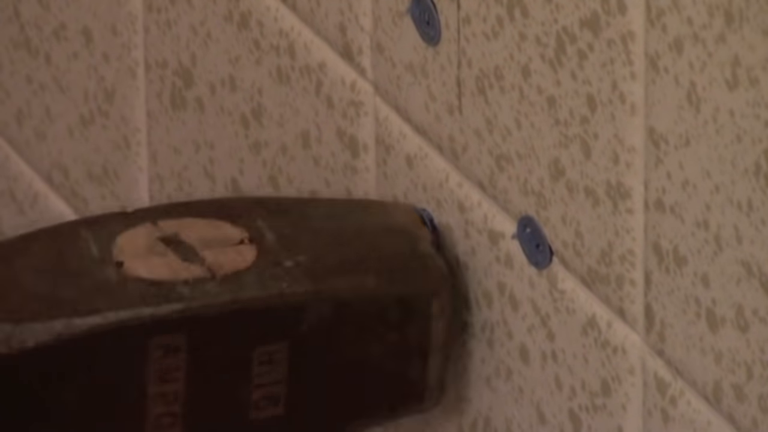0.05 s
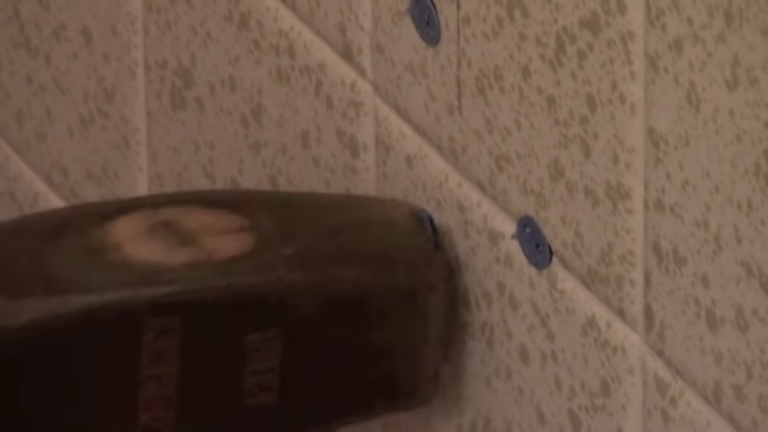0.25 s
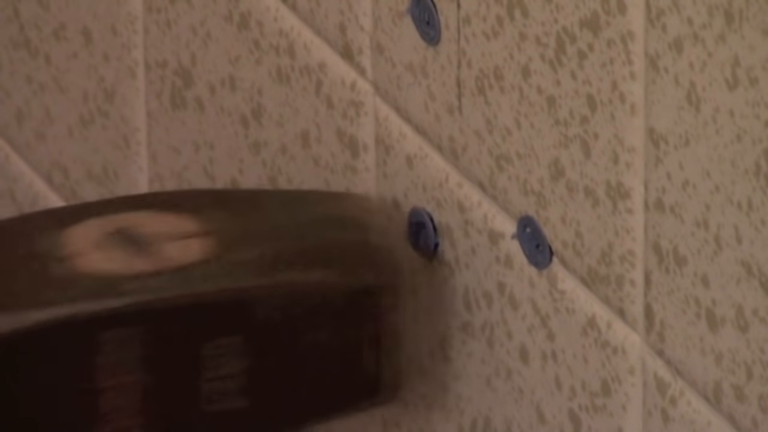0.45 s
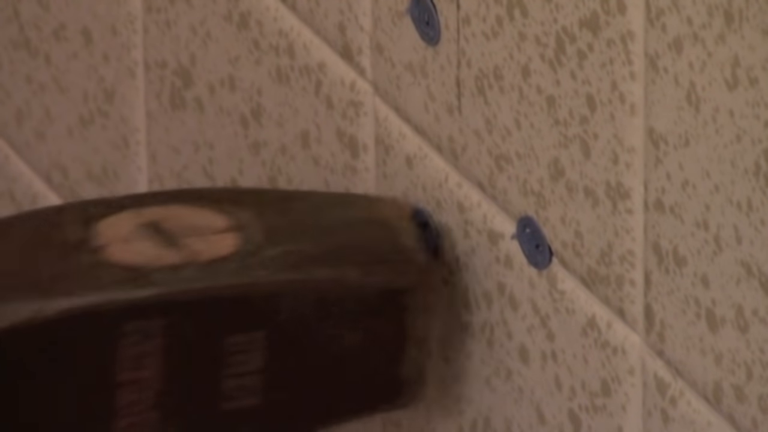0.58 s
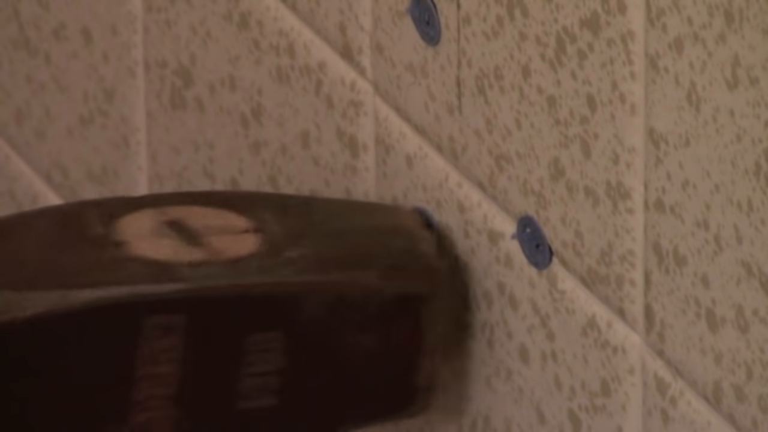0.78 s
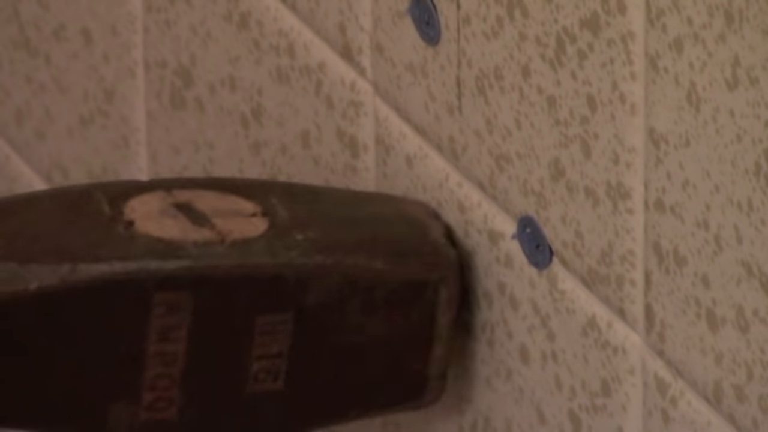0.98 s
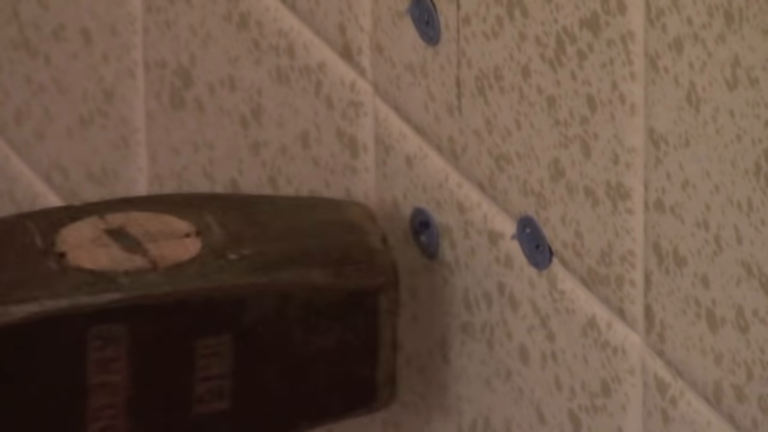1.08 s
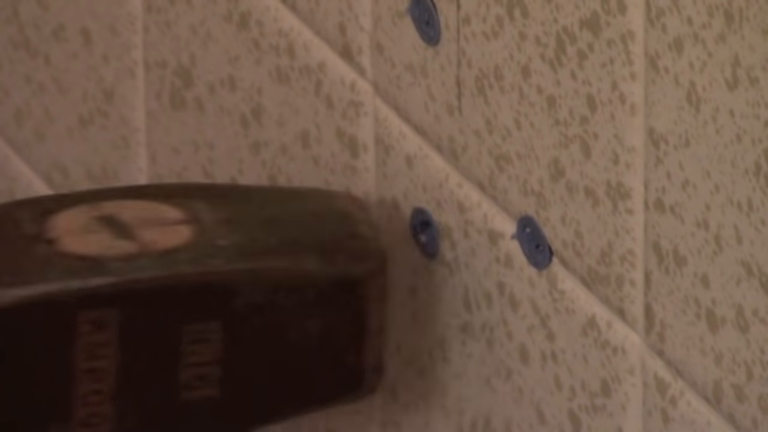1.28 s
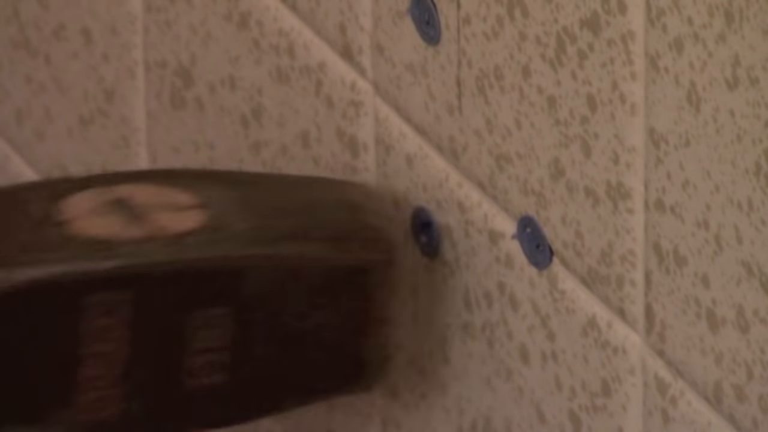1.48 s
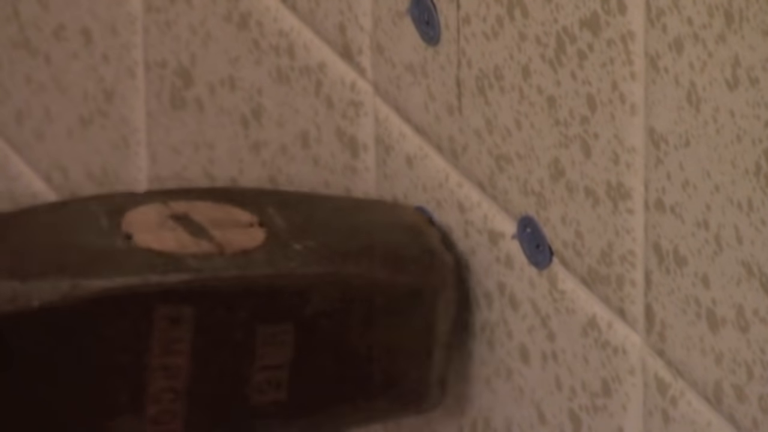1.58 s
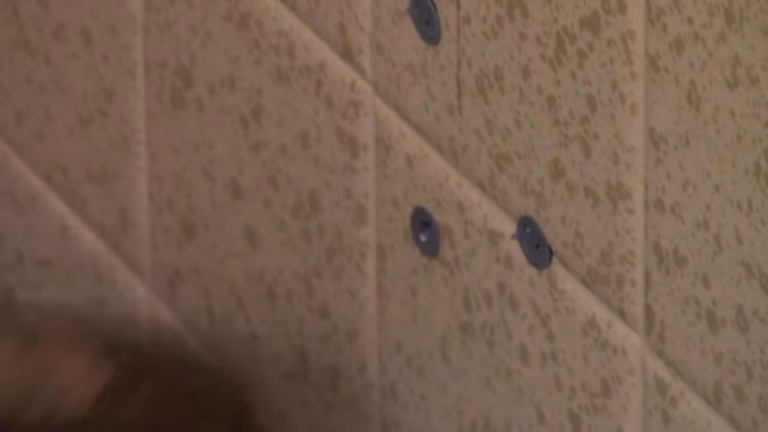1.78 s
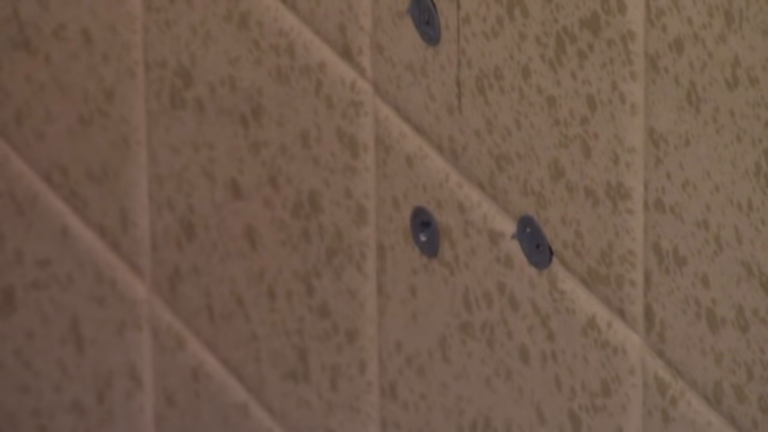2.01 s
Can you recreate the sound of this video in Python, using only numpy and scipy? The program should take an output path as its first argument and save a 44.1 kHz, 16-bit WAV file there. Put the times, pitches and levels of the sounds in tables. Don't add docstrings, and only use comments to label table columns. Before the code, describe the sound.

Steel hammer taps a plastic anchor into a tiled wall, eight steady knocks growing firmer and boomier

```python
import sys
import numpy as np
from scipy import signal
from scipy.fft import rfft, irfft
from scipy.io import wavfile

SR = 44100
rng = np.random.default_rng(int(sys.argv[2]) if len(sys.argv) > 2 else 0)


def voltage_ratio(level):
    return 10 ** (np.asarray(level, float) / 20)


def waveform_to_disk(signal):
    frames = np.transpose(np.atleast_2d(signal))
    scaled = np.clip(frames, -1, 1) * 32767
    samples = np.round(scaled).astype(np.int16)
    wavfile.write(sys.argv[1], SR, samples)


N = 90404
LEAD = SR // 10
RING = SR

# (time [s], tile level [dB], contact time [ms], panel level [dB], tick level [dB])
BLOWS = [
    (-.072, -9.5, 0.26, -24.5, -63),
    (0.1504, -12.5, 0.1, -18.5, -31),
    (0.3722, -12, 0.19, -12, -34),
    (0.5938, -12, 0.17, -10.5, -38),
    (0.8052, -6.5, 0.16, -9.5, -28.5),
    (1.0244, -4.5, 0.21, -9.5, -40.5),
    (1.2509, -4.5, 0.2, -8, -35),
    (1.4730, -2, 0.18, -7.5, -48),
    (1.6948, -1.5, 0.17, -7.5, -41.5),
]
# (bright wash [dB], knock [dB], cavity [dB], upper panel [dB], clack [dB])
LANDINGS = [(-6.5, -3, 4.5, -4, 0), (-1, 2, -17, -1, 3.5), (-6.5, -5.5, -0.5, -10.5, 4.5),
            (-1.5, 1.5, -0.5, -12, 1), (3, 4, -0.5, -10.5, -6), (0.5, -17, 2, 0, -3), (2, 1.5, 2.5, -1, -4),
            (2.5, -3, 1, 1, 0), (4, -2.5, 0, -1.5, -3)]


def band(x, hz, width):
    return signal.lfilter(*signal.iirpeak(min(hz, .45 * SR), hz / width, fs=SR), x)


def twice(x, hz, width):
    return band(band(x, hz, width), hz, width)


def fade(t60):
    return np.exp(-np.log(1000) * np.arange(RING) / SR / t60)


def rise(seconds):
    return 1 - np.exp(-np.arange(RING) / SR / seconds)


def modes(table, degrees):
    t = np.arange(RING) / SR
    return sum(np.sign(side) * voltage_ratio(db) * np.cos(2 * np.pi * hz * t + np.radians(degrees)) * fade(t60)
               for hz, db, t60, side in table)


def lay(sounds):
    out = np.zeros(LEAD + N + 2 * RING)
    for row, sound in zip(BLOWS, sounds):
        start = LEAD + int(row[0] * SR)
        out[start:start + len(sound)] += sound
    return out[LEAD:LEAD + N]


def push(contact_ms):
    t = np.arange(SR // 100) / (contact_ms * SR / 1000)
    force = (.6 * t) ** 2 * t * np.exp(-1.6 * t)
    return force / force.sum()


def flexing():
    # (frequency [Hz], level [dB], t60 [s], side of nodal line)
    deep_modes = [(45.3, -26, 0.91, 1), (48.6, -45.5, 0.13, 1), (66, -23.5, 0.43, -1), (83, -31, 0.38, 1)]
    # (frequency [Hz], level [dB], t60 [s], side of nodal line)
    stud_modes = [(128.32, -15, 0.44, 1)]
    return modes(deep_modes, 120) + modes(stud_modes, 205)


def panel():
    # (frequency [Hz], level [dB], t60 [s], side of nodal line)
    panel_modes = [(152.7, -9.5, 0.42, 1), (218.9, -5, 0.37, 1)]
    return modes(panel_modes, 140)


def upper_panel():
    # (frequency [Hz], level [dB], t60 [s], side of nodal line)
    upper_modes = [(331.7, -8, 0.2, 1), (347.6, -12, 0.62, -1), (370.8, -16.5, 0.56, 1),
                   (417.4, -14.5, 0.36, 1), (450.4, -17, 0.57, 1), (468, -12, 0.43, 1)]
    return modes(upper_modes, 140)


def cavity():
    # (frequency [Hz], level [dB], t60 [s], side of nodal line)
    cavity_modes = [(252.7, 3, 0.24, 1), (248.1, -13, 0.18, -1)]
    return modes(cavity_modes, 105) * rise(0.017)


def tile():
    # (frequency [Hz], level [dB], t60 [s], side of nodal line)
    tile_modes = [(507.9, -10, .25, 1), (571, -11.5, 0.18, 1), (640.7, -14.5, 0.13, -1), (676, -24, 0.7, 1),
                  (675, -43, 0.49, 1), (850.7, -22, 0.47, -1), (886.5, -10, 0.12, 1),
                  (1027, -30.5, 0.45, -1), (1008.6, -22, 0.68, -1), (1071, -15, 0.17, 1),
                  (1223, -18, 0.6, -1), (1201, -12, 0.17, 1), (1257, -18, 0.12, -1), (1595, -24, 0.1, 1)]
    longest_t60 = .36
    damped = [(hz, db, min(t60, longest_t60), side) for hz, db, t60, side in tile_modes]
    return modes(damped, 170) * rise(0.0096)


def thump(time):
    flush_s = 1.0
    pitch = .96 if time > flush_s else 1
    return modes([(632 * pitch, 4, 0.027, 1)], 170)


def knock():
    # (frequency [Hz], level [dB], t60 [s], side of nodal line)
    knock_modes = [(873.5, -12.5, 0.063, -1), (1062, -11, 0.079, 1), (1209.7, -6.5, 0.1, 1),
                   (1285, -18.5, 0.059, -1)]
    return modes(knock_modes, 170)


def clack():
    # (frequency [Hz], level [dB], t60 [s], side of nodal line)
    clack_modes = [(1918, -5, 0.048, -1), (2216, -4, .04, 1)]
    return modes(clack_modes, 170)


def dense(rise_s):
    # (frequency [Hz], level [dB], t60 [s])
    dense_curve = [(59.4, -41, 0.48), (186, -26, 0.35), (640, -22.5, 0.37), (1260, -20.5, 0.34),
                   (2040, -21, 0.33), (3470, -19.5, 0.23), (6000, -46, .35), (12700, -39.5, .4)]
    hz, db, t60 = np.array(dense_curve).T
    out = 0
    for centre in 50 * 2 ** (np.arange(25) / 3):
        x = twice(rng.standard_normal(RING), centre, centre / 4)
        level = np.interp(np.log(centre), np.log(hz), db)
        decay = np.interp(np.log(centre), np.log(hz), t60)
        out = out + x / x.std() * voltage_ratio(level) * fade(decay)
    return voltage_ratio(6) * out * rise(rise_s)


def wall():
    dense_rise_s, split_hz = 0.0011, 470
    room = dense(dense_rise_s)
    low_pass = signal.butter(4, split_hz, fs=SR, output="sos")
    low = signal.sosfiltfilt(low_pass, room)
    deep, lower, air = flexing(), panel(), cavity()
    upper = upper_panel() + voltage_ratio(4.5) * low
    bright = tile() + (room - low) * rise(dense_rise_s)
    hard, collar = knock(), clack()
    panel_rise = rise(0.0014)

    def blow(row, landing):
        time, tile_db, contact_ms, panel_db, _ = row
        _, knock_db, cavity_db, upper_db, clack_db = landing
        response = voltage_ratio(0.14 * (panel_db + 5)) * deep
        response = response + voltage_ratio(panel_db) * panel_rise * (lower + voltage_ratio(upper_db) * upper)
        response = response + voltage_ratio(panel_db + cavity_db) * air
        struck = bright + thump(time) + voltage_ratio(knock_db) * hard + voltage_ratio(clack_db) * collar
        response = response + voltage_ratio(tile_db) * struck
        return signal.fftconvolve(response, push(contact_ms))

    return voltage_ratio(0.5) * lay(blow(row, landing) for row, landing in zip(BLOWS, LANDINGS))


def crackle():
    return rng.standard_normal(RING) * voltage_ratio(2.2 * rng.exponential(size=RING))


def steel(x):
    # (frequency [Hz], width [Hz], level [dB])
    head_bands = [(1575, 80, -6.5), (2090, 150, 0.5), (3013, 440, 3.5), (3550, 340, -1), (4640, 300, -19.5),
                  (7350, 550, -12), (10600, 4000, -18.5)]
    ring = sum(voltage_ratio(db) * twice(x, hz, width) for hz, width, db in head_bands)
    return twice(x, 3530, 2880) + ring


def tick():
    wash = fade(0.39) * rise(0.0013)

    def contact(tick_db, wash_db):
        direct = twice(crackle() * fade(0.0076), 8800, 7000)
        echo = steel(crackle() * wash)
        return voltage_ratio(tick_db - 2.5) * direct + voltage_ratio(-33 + wash_db - 6.5) * echo

    return lay(contact(row[4], landing[0]) for row, landing in zip(BLOWS, LANDINGS))


def floor():
    # (frequency [Hz], level [dB per Hz])
    floor_curve = [(30, 3), (100, 1.5), (360, -8.5), (1000, -20.5), (3000, -32.5), (7500, -30),
                   (11500, -38), (16000, -47.5)]
    f = np.maximum(np.arange(N // 2 + 1) * SR / N, 1)
    hz, db = np.array(floor_curve).T
    spectrum = voltage_ratio(np.interp(np.log(f), np.log(hz), db))
    x = irfft(rfft(rng.standard_normal(N)) * spectrum, N)
    return x / x.std() * voltage_ratio(-49.5)


def scuffs():
    # (time [s], level [dB], rise [s], fall [s])
    scuff_events = [
        (1.805, -66, .012, .015),
        (.975, -68, .004, .008),
        (2.032, -61, .022, .05),
    ]
    t = np.arange(N) / SR
    envelope = sum(voltage_ratio(db) * np.exp(-np.where(t < s, (s - t) / attack, (t - s) / release))
                   for s, db, attack, release in scuff_events)
    grain = rng.standard_normal(N) * voltage_ratio(2.5 * rng.exponential(size=N))
    rub = voltage_ratio(4.0) * band(grain, 4940, 7000)
    rub = rub + voltage_ratio(13) * band(grain, 670, 1200) + voltage_ratio(24) * band(grain, 150, 100)
    return envelope * rub


def gate():
    shuts_s, opens_s, slew_s, depth_db = 1.91, 1.995, .02, -8
    t = np.arange(N) / SR
    shut = np.tanh((t - shuts_s) / slew_s) - np.tanh((t - opens_s) / (6.3 * slew_s))
    return voltage_ratio(depth_db * shut / 2)


def scene():
    return (wall() + tick() + floor() + scuffs())[None]


def top_cut(x):
    return signal.sosfilt(signal.butter(12, 15800, fs=SR, output="sos"), x)


def record(dry):
    gain = gate()
    x = gain * dry + (1 - gain) * band(dry, 740, 3600)
    return top_cut(np.tanh(.8 * x) / .8)


dry = scene()
out = record(dry)
waveform_to_disk(out)
```